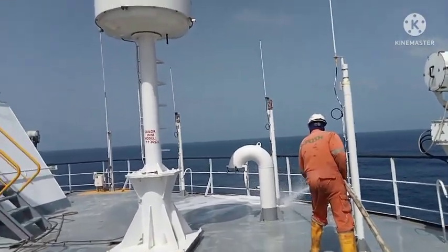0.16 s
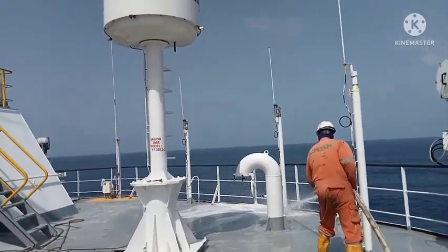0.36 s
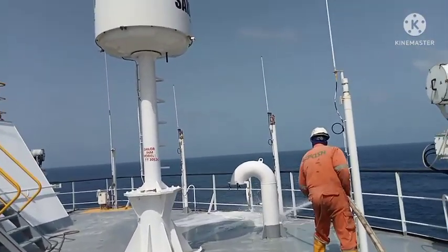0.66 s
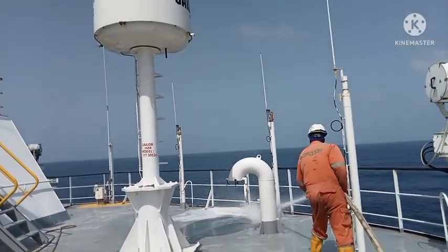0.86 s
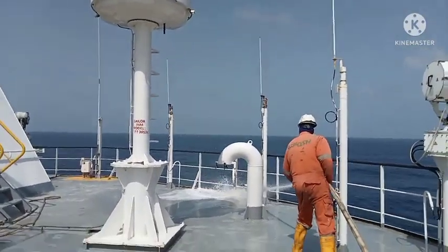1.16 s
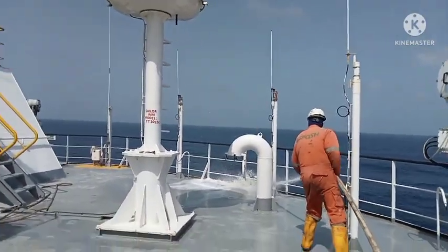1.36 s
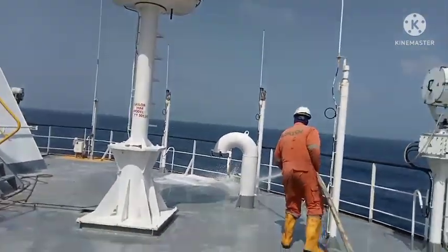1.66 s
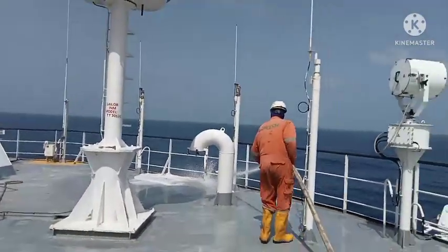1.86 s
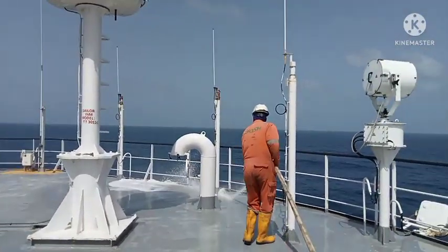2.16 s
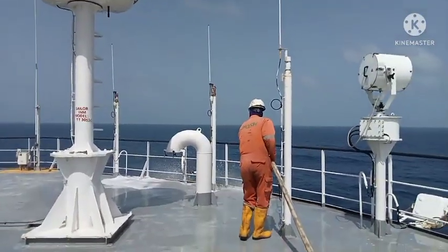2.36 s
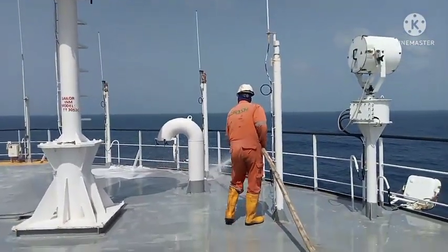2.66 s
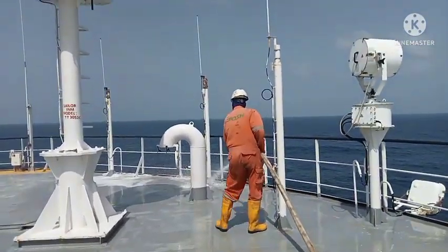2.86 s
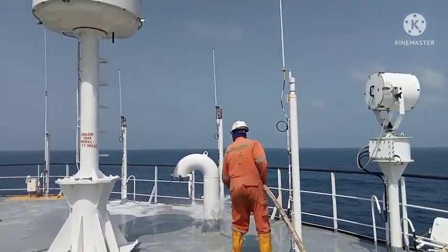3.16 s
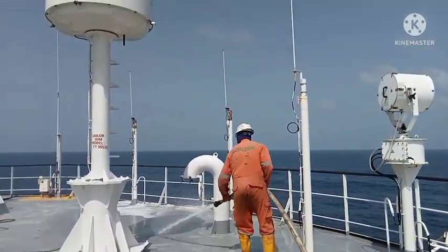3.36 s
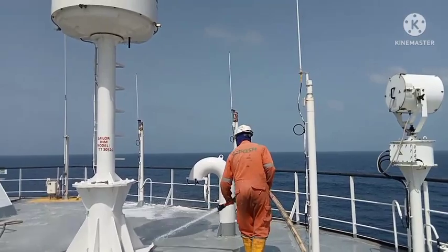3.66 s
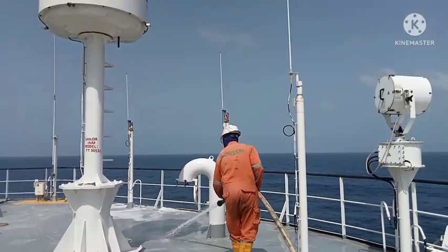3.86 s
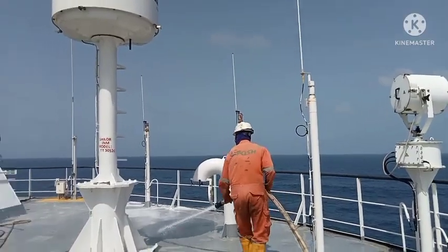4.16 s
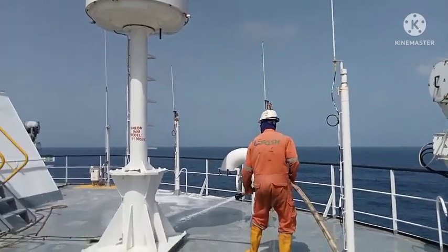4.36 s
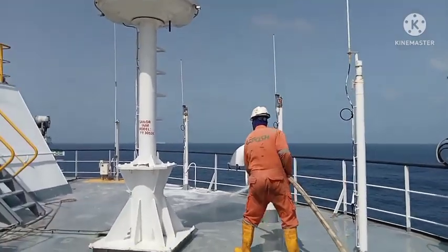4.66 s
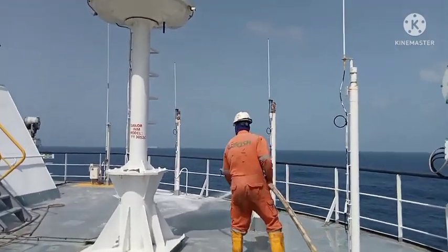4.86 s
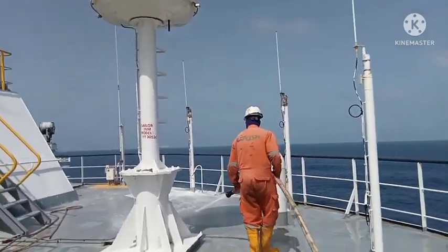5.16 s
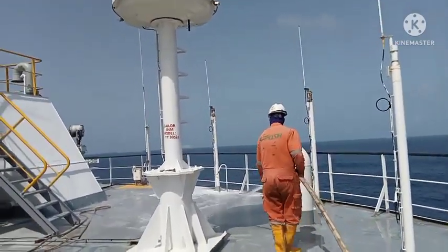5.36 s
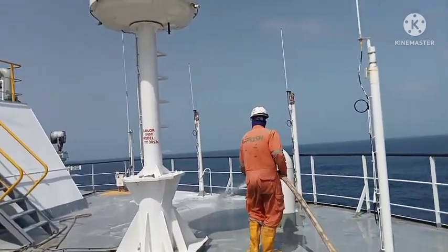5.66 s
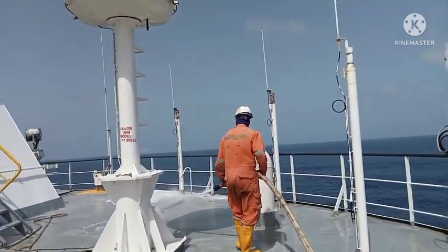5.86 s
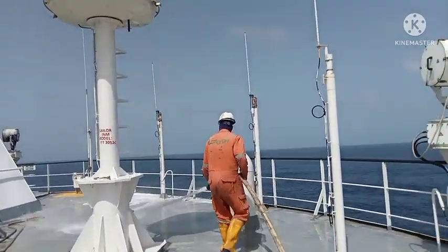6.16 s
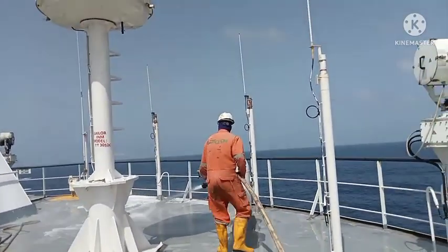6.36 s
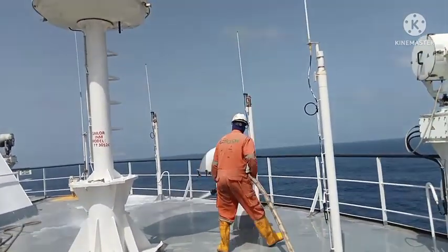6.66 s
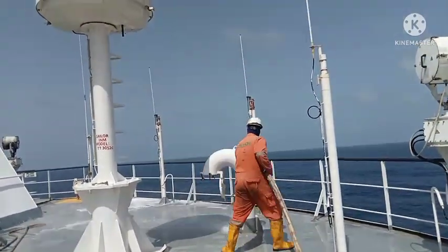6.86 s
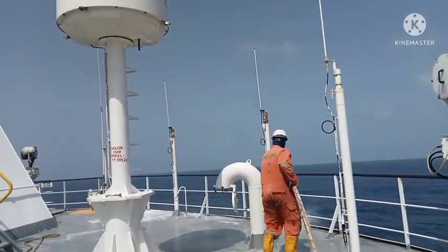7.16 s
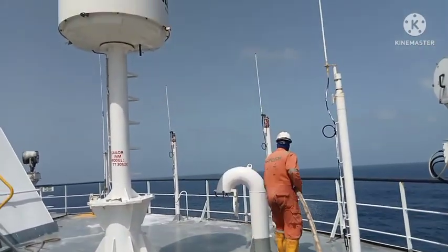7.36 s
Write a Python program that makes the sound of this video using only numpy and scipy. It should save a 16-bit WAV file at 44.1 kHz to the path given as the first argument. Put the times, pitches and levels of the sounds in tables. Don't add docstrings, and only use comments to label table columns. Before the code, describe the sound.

Wind first rumbles and pops hard against an unprotected handheld microphone outdoors, then dies down, leaving hissing hose water on a steel deck. The spray surges and splats irregularly as it crosses rails and posts, strongest around three seconds. Hose fittings click sharply near four. The ship's deep engine drone and soft wash continue throughout, and blustery wind with a loud splash closes the scene.

```python
import sys
import numpy as np
from scipy import signal
from scipy.io import wavfile
from scipy.ndimage import uniform_filter1d

SR = 44100
rng = np.random.default_rng(int(sys.argv[2]) if len(sys.argv) > 2 else 0)


def digitize_waveform(pressure):
    field = np.atleast_2d(pressure).T
    bounded = np.clip(field, -1, 1)
    quanta = np.round(bounded * 32767).astype(np.int16)
    wavfile.write(sys.argv[1], SR, quanta)


def convert_level_to_amplitude(level_db):
    exponent = np.asarray(level_db, float) / 20
    return 10 ** exponent


N = 331279


def jet():
    spray = ringing_steel(droplets())
    return deck_echo(near_fittings(spray))


def droplets():
    # (time [s], level [dB])
    open_deck = [(0, -45), (1, -45.5), (2, -43.5), (3, -47.5), (4, -45), (5, -45), (5.6, -46.5), (6.4, -46),
                 (7.51, -45)]
    # (frequency [Hz], density [dB per Hz])
    spray_colour = [(700, -13), (1090, -4), (1720, -9.5), (2100, -7), (2700, -7.5), (3110, -8.5),
                    (3620, -7.5), (4000, -3), (4900, -0.5), (7500, 0), (10700, -0.5), (12100, -3),
                    (12800, -7.5), (15500, -9.5)]
    # (start [s], length [s], level [dB], loudest region [octaves above 1 kHz])
    rushes = [(-0.011, 0.4, -38, 2.56), (0.22, 0.83, -35, 1.82), (0.274, 0.51, -38.5, 3.4),
              (0.607, 0.21, -28.5, 0.92), (1.031, 0.99, -41.5, 0.73), (1.269, 0.31, -41.5, 3.7),
              (1.466, 0.54, -48, 2.1), (1.737, 0.99, -38, 0.69), (2.119, 0.3, -35.5, 2.87),
              (2.204, 0.86, -34, 0.64), (2.43, 0.72, -41, 3.26), (2.639, 0.74, -47, 0.54),
              (2.77, 0.89, -35, 1.1), (2.88, 0.95, -28, 3.38), (3.109, 0.84, -37.5, 0.97),
              (3.725, 0.37, -36.5, 1.05), (3.728, 0.64, -35, 3.65), (3.876, 0.91, -43, 1.4),
              (3.9, 0.12, -32, 0.79), (4.024, 0.93, -41.5, 3.5), (4.17, 1, -47, 0.96),
              (4.609, 0.98, -43, 1.2), (5.135, 0.93, -41.5, 3.45), (5.662, 0.95, -49, 1.2),
              (6.324, 0.25, -39, 3.4), (6.554, 0.36, -41.5, 3.3), (6.779, 0.46, -31, 3.12),
              (6.84, 0.53, -30, 2.27), (6.941, 0.27, -30.5, 0.17), (7.173, 0.41, -36.5, 1.93)]
    # (start [s], length [s], level [dB], loudest region [octaves above 1 kHz])
    splats = [(0.37, .09, -40, 2.5), (3.09, .14, -38, 3.2), (3.262, 0.099, -29.5, 1.5),
              (0.215, 0.045, -36, 2.6), (0.445, .06, -35, 2), (5.55, .1, -48, 3.8), (5.77, 0.033, -36, 3.8),
              (5.909, .03, -42, 3.7), (5.96, .04, -38.5, 2.4), (6.314, .02, -37, 3.5),
              (6.42, .04, -38.5, 2.3), (2.355, 0.033, -50, 1.2), (3.4, .05, -35, 3),
              (3.445, 0.043, -29.5, 3.2), (4.05, 0.076, -31, 3.8), (6.382, 0.1, -34, 3.5),
              (6.63, 0.029, -41, 3.7), (7.043, 0.017, -16.5, 2.2), (7.095, 0.055, -30, 3.5),
              (7.353, 0.023, -28, 1.5), (7.415, 0.024, -29.5, 1.9)]
    # (start [s], length [s], level [dB], loudest region [octaves above 1 kHz])
    surges = [(0.205, 0.098, -32.5, 3.8), (0.214, 0.06, -33, 0.7), (0.353, 0.17, -34, 1.3),
              (0.531, 0.19, -31, 1.3), (1.984, 0.1, -35, 3.7), (2.556, 0.13, -29, 3.26),
              (2.608, 0.21, -28.5, 0.12), (2.79, 0.36, -30, 0.6), (2.791, 0.38, -33, 3.2),
              (3.076, 0.22, -26.5, 3.8), (3.089, 0.11, -30.5, 0.9), (3.254, 0.13, -28, 1.5),
              (3.893, 0.23, -38, 3), (4.439, 0.05, -38, 1.34), (4.732, 0.37, -40, 3.75),
              (5.015, 0.14, -46, 3.6), (5.075, 0.11, -37, 3.9), (5.136, 0.21, -38.5, 3.35),
              (5.544, 0.24, -36, 4.7), (5.761, 0.14, -37, 1.7), (5.807, 0.054, -36, 0.84),
              (5.896, 0.16, -35, 3.3), (6.309, 0.026, -39, 3.8), (6.973, 0.091, -23.5, 2.43),
              (7.347, 0.035, -26, 0.51), (7.405, 0.23, -41, 2.2), (7.483, 0.201, -36, 3),
              (7.495, 0.059, -34, 0.31)]
    # (start [s], length [s], level [dB], loudest region [octaves
    # above 1 kHz])
    narrow_hisses = [(.4, 0.34, -41, 5), (.55, .25, -37, 1.5), (.92, .3, -45, -3), (1, 0.28, -44, 0.5),
                     (1.2, .3, -44, 2), (1.95, 0.23, -47, 4.5), (1.98, .25, -44, 5), (2.05, 0.22, -43, -1),
                     (2.1, 0.24, -41, 3.5), (2.85, .15, -42, -5), (3, .15, -28, 1.2), (3.07, 0.19, -32, 2.45),
                     (3.2, 0.26, -42, -2), (3, 0.27, -39, 0), (4.15, 0.25, -35.5, 3), (4.1, .5, -51, 7.5),
                     (4.48, 0.091, -41, -0.5), (4.85, 0.23, -45, 2.6), (5.2, .45, -42, -0.5),
                     (5.5, 0.27, -37, 2.5), (5.55, .15, -44, 6), (6.3, 0.22, -42, 0.3), (7.2, 0.18, -45, 4),
                     (.05, 0.25, -37, 2.5), (4.3, 1, -42, 2), (2.24, 0.1, -34, 0.5), (3.1, .15, -31, 3.2),
                     (3.2, .2, -35, 6.5)]
    tilt_db = -0.04
    patchy_db, flutter_db, grain_db = 1.07, 1.05, 1.0
    surge_late_s = 0.0037

    hz, noise = zip(*bands(676, 15720, count=30))
    hz = np.array(hz)
    steady = convert_level_to_amplitude(in_time(open_deck)[0]) ** 2
    sweep = heard(rushes, hz, narrow_db=6.5)
    sweep = sweep + heard(splats, hz, narrow_db=7.4, rise_s=0.0056)
    late_surges = np.add(surges, [surge_late_s, 0, 0, 0])
    sweep = sweep + heard(late_surges, hz, narrow_db=3.5, rise_s=0.013)
    sweep = sweep + heard(narrow_hisses, hz, narrow_db=50)

    together = flutter_db * drift(13.3) + grain_db * drift(270)
    spray = 0
    for f, band, power in zip(hz, noise, sweep):
        colour_db = at_hz(spray_colour, f) + 7.26 + tilt_db * np.log2(f / 4000)
        band_db = colour_db + together + patchy_db * drift(3.4)
        spray = spray + convert_level_to_amplitude(band_db) * np.sqrt(steady + fill(power)) * band
    return spray


def ringing_steel(spray):
    # (frequency [Hz], width [Hz], level [dB])
    steelwork = [(1020, 650, -5.5), (2020, 1800, -11.5), (3104, 450, 2.5), (3910, 180, -9.5),
                 (11750, 260, -3.5)]
    # (time [s], level [dB])
    vent = [(0, -22), (.5, -4), (1.6, -8), (2.1, -6), (2.9, -1), (3.15, -10), (3.35, -6), (3.9, 5),
            (4.4, -15), (4.9, -7), (5.4, -11), (6.5, -20), (6.9, -11), (7.51, -14)]
    plates = sum(convert_level_to_amplitude(db + 0.8 * drift(6.5)) * resonance(spray, hz, w) for hz, w, db in steelwork)
    spray = spray + plates
    return spray + convert_level_to_amplitude(in_time(vent)[0]) * resonance(spray, hz=4970, width_hz=430)


def near_fittings(spray):
    fitting_lags = [.7, .9, 1.05, 1.3, 1.5, 1.7]
    usual_share = .05
    return spray + sum(usual_share * drift(5.8) * np.roll(spray, round(ms * SR / 1000)) for ms in fitting_lags)


def deck_echo(spray):
    # (start [s], length [s], lag [ms], share [ratio])
    echoes = [(-0.08, 0.34, 1.24, 0.52), (0.19, 0.67, 1.28, 0.39), (0.23, 0.25, 1.08, 0.27),
              (0.95, 0.34, 1.07, 0.28), (0.97, 0.25, 1.63, 0.27), (1.69, 0.34, 1.21, 0.36),
              (1.76, 0.76, 0.84, 0.27), (2.07, 0.42, 1.24, 0.36), (2.58, 0.34, 1.2, 0.29),
              (2.94, 0.25, 1.4, 0.33), (3.32, 0.34, 1.03, 0.31), (3.37, 0.34, 1.23, 0.27),
              (3.71, 0.59, 1.0, 0.41), (4.65, 0.34, 0.8, 0.28), (4.65, 0.34, 1.13, 0.38),
              (4.97, 0.25, 1.12, 0.28), (5.41, 0.5, 1.23, 0.47), (5.48, 0.17, 1.74, 0.28),
              (5.51, 0.25, 0.81, 0.4), (5.61, 0.25, 1.6, 0.33), (6.28, 0.34, 0.74, 0.27),
              (6.53, 0.34, 1.29, 0.3), (6.81, 0.67, 1.28, 0.44), (6.83, 0.09, 1.22, 0.27),
              (7.11, 0.17, 1.01, 0.31), (7.29, 0.25, 1.74, 0.29)]
    start_s, length_s, lag_ms, share = np.transpose(echoes)
    shares = share[:, None] * swell(start_s, length_s, 0.45)
    dull = signal.lfilter(*signal.butter(1, 13000, fs=SR), spray)
    late = sum(fill(part) * np.roll(dull, round(ms * SR / 1000)) for ms, part in zip(lag_ms, shares))
    return (spray + late) / fill(np.sqrt(1 + (shares ** 2).sum(axis=0)))


def whistles(spray):
    usual_db, width_share = -8.0, .03
    pitches = np.geomspace(900, 12000, num=34) * rng.uniform(.97, 1.03, 34)
    return sum(convert_level_to_amplitude(usual_db) * drift(5.0) * resonance(spray, hz, width_share * hz) for hz in pitches)


def wind():
    # (frequency [Hz], density [dB per Hz])
    buffet = [(50, -48), (90, 1), (150, 5.5), (240, 1), (480, -8), (900, -24), (1400, -39.5), (2400, -81)]
    lumpy_db, own_db = 1.5, 1.2
    thud_even, rasp_even = 0.36, 0.27

    gust, gust_bright = gusts()
    puff, puff_bright = puffs()
    gust = gust * convert_level_to_amplitude(lumpy_db * drift(22))
    level = np.hypot(gust, puff)
    bright = (gust_bright * gust + puff_bright) / (gust + puff)
    parts = []
    for hz, band in bands(47.2, 2676, count=14):
        band_db = at_hz(buffet, hz) + bright * np.log2(hz / 350) + own_db * drift(34)
        parts.append(convert_level_to_amplitude(band_db) * steadied(band, hz))
    thud, rasp = sum(parts[:6]), sum(parts[6:])

    thud_swing = uniform_filter1d(unit(thud) ** 2, size=700) + 0.14
    rasp_swing = uniform_filter1d(unit(rasp) ** 2, size=250) + 0.015
    crackle = convert_level_to_amplitude(1.1 * drift(90))
    flow = thud / thud_swing ** (thud_even / 2) + rasp / rasp_swing ** (rasp_even / 2)
    return level * crackle * convert_level_to_amplitude(1.1) * unit(flow)


def gusts():
    # (start [s], length [s], level at 200-600 Hz [dB], brightness [dB per octave])
    gust_rows = [(-0.145, 0.21, -2, 2), (0.113, 0.19, -21, 4), (0.264, 0.095, -17.5, -2.5),
                 (0.374, 0.072, -28, -4.5), (0.38, 0.24, -27.5, 4), (0.5, 0.083, -18.5, -3),
                 (0.622, 0.3, -35.5, -1.5), (0.623, 0.061, -20, 3), (0.887, 0.2, -34.5, -10.5),
                 (2.44, 0.25, -26, 6), (2.475, .09, -28, -2), (2.658, 0.13, -29.5, -2),
                 (3.78, 0.1, -34.5, 6), (4.425, 0.13, -35, 1), (3.666, 0.078, -31.5, 1),
                 (5.085, 0.048, -29, -3), (5.273, 0.14, -17.5, 2.5), (5.35, 0.19, -31.5, -4),
                 (5.421, 0.2, -22, 0), (5.616, 0.1, -26, 0), (5.747, 0.17, -29, 6), (5.929, 0.077, -36, 7),
                 (6.509, 0.097, -28.5, -11), (6.53, 0.29, -32.5, -1), (6.605, 0.074, -17, 4.5),
                 (6.761, 0.049, -15.5, 2.5), (6.864, 0.069, -19, -6.5), (6.939, 0.074, -24.5, -4),
                 (7.049, 0.33, -18, -3), (7.271, 0.23, -17.5, 7.5), (7.35, 0.096, -15, -8)]
    lull_db = -81
    start_s, length_s, gust_db, tilt_db = np.transpose(gust_rows)
    power = (convert_level_to_amplitude(gust_db + 0.5)[:, None] * swell(start_s, length_s, rise=0.43)) ** 2
    total = power.sum(axis=0) + convert_level_to_amplitude(lull_db) ** 2
    return fill(np.sqrt(total)), fill(tilt_db @ power / total)


def puffs():
    # (time [s], peak level [dB], length [s], brightness [dB per octave])
    eddies = [(0.007, -2, 0.017, 0), (0.03, -23, 0.024, -8), (0.048, -13.5, 0.028, -3),
              (0.079, -16, 0.017, 1), (0.118, -13, 0.031, 1), (0.141, -15, 0.015, -7),
              (0.18, -17.5, 0.023, 2), (0.198, -8, 0.029, 5.5), (0.218, -16, 0.034, -1),
              (0.249, -19, 0.036, -3), (0.296, -22, 0.023, 0.5), (0.31, -13.5, 0.034, 0),
              (0.35, -20, 0.028, -9), (0.395, -18.5, 0.027, -6), (0.416, -14, 0.031, -2.5),
              (0.454, -21, 0.021, 6), (0.493, -13.5, 0.022, 6.5), (0.515, -23, 0.026, -6),
              (0.553, -16.5, 0.021, 1), (0.649, -21, 0.03, -2), (0.665, -20, 0.031, 0),
              (0.803, -30, 0.025, -8), (0.983, -21.5, 0.017, -13.5), (1.034, -23, 0.02, 6),
              (2.23, -32, 0.025, -1), (2.49, -19.5, 0.028, 4), (2.526, -22, 0.025, -4),
              (2.55, -31, 0.022, -2), (2.616, -22, 0.022, 8), (2.719, -25, 0.029, 0.5),
              (5.287, -34, 0.018, -8), (5.31, -23, 0.03, -12), (5.339, -8, 0.013, -4),
              (5.39, -31, 0.023, 0.5), (5.482, -16, 0.018, -4), (5.514, -14.5, 0.029, 2.5),
              (5.543, -18, 0.031, -3), (5.574, -23, 0.03, 7), (5.646, -29, 0.023, -6),
              (5.673, -24, 0.018, 1), (5.707, -8.5, 0.025, -1.5), (5.727, -19, 0.017, -16),
              (5.768, -27, 0.025, 2), (5.783, -26, 0.028, -3), (5.824, -23, 0.023, -1),
              (5.952, -29, 0.027, -8)]
    # (time [s], peak level [dB], length [s], brightness [dB per octave])
    squall = [(6.521, -22, 0.02, 0.5), (6.542, -12.5, 0.018, 0.5), (6.567, -21, 0.02, 0.5),
              (6.627, -11.5, 0.02, 0.5), (6.643, -16, 0.015, 0.5), (6.671, -14.5, 0.021, 0.5),
              (6.699, -24, 0.029, 0.5), (6.73, -11.5, 0.019, 0.5), (6.771, -17, 0.023, 0.5),
              (6.784, -12, 0.014, 0.5), (6.809, -7.5, 0.022, 0.5), (6.835, -10, 0.024, 0.5),
              (6.869, -20, 0.018, 0.5), (6.91, -14, 0.02, 0.5), (6.949, -17, 0.015, 0.5),
              (6.972, -16, 0.014, 0.5), (7.079, -20, 0.025, 0.5), (7.098, -26, 0.02, 0.5),
              (7.098, -17, 0.043, 0.5), (7.138, -4, 0.013, 0.5), (7.174, -9, 0.018, 0.5),
              (7.187, -15, 0.031, 0.5), (7.227, -1.5, 0.013, 0.5), (7.249, -34, 0.02, 0.5),
              (7.285, -8.5, 0.02, 0.5), (7.321, -24, 0.02, 0.5), (7.334, -12, 0.025, 0.5),
              (7.349, -14, 0.021, 0.5), (7.367, -14, 0.023, 0.5), (7.389, -10, 0.022, 0.5),
              (7.401, -7.5, 0.011, 0.5), (7.438, -9.5, 0.028, 0.5), (7.469, -26, 0.025, 0.5)]
    level, bright = np.zeros(N), np.zeros(N)
    for s, db, length_s, tilt in list(eddies) + list(squall):
        at = round(s * SR)
        t = np.arange(SR // 5)[:N - at] / SR
        shape = convert_level_to_amplitude(db + 5.5 - 18 * t / length_s) * (1 - np.exp(-t / 0.0041))
        level[at:at + len(t)] += shape
        bright[at:at + len(t)] += tilt * shape
    return level, bright


def flicks():
    # (time [s], peak level [dB], frequency [Hz])
    pushes = [(0.012, -13, 253), (0.1185, -13, 520), (0.025, -4, 302), (0.209, -4, 330), (0.318, -13, 380),
              (0.497, -10, 454), (2.496, -14, 160), (2.522, -12, 300), (2.54, -10, 326), (5.342, -19, 478),
              (5.516, -7, 420), (5.58, -10.5, 480), (5.735, -9, 250), (6.647, -12, 317), (6.812, -6, 327),
              (6.841, -7, 513), (6.535, -10.5, 145), (6.814, -9, 646), (7.14, -10, 306), (7.176, -4, 270),
              (7.229, -10, 400), (7.286, -15, 520), (7.232, -3.5, 646), (7.368, -8, 450), (7.401, -10, 279),
              (7.44, -10, 302)]
    swing_cycles, rise_s = 6.5, 0.00042
    out, t = np.zeros(N + SR), np.arange(SR // 10) / SR
    for s, db, hz in pushes:
        envelope = convert_level_to_amplitude(db - 60 * t * hz / swing_cycles) * (1 - np.exp(-t / rise_s))
        out[round(s * SR):][:len(t)] -= envelope * np.cos(2 * np.pi * hz * t)
    return out[:N]


def ticks():
    # (time [s], peak level [dB], frequency [Hz], t60 [s])
    knocks = [
        (2.36, -25, 2230, .017),
        (3.931, -16, 2300, .013),
        (3.9305, -19, 2900, .014),
        (3.9445, -15, 2150, .017),
        (3.945, -21, 1500, .011),
        (3.945, -27, 900, .015),
        (3.965, -28, 2100, .02),
        (4.448, -38, 2400, .02),
        (6.5, -37, 1900, .02),
        (6.597, -37, 1880, .02),
    ]
    t = np.arange(N) / SR
    return sum(struck([(s, db, .0004, t60)]) * np.sin(2 * np.pi * hz * (t - s)) for s, db, hz, t60 in knocks)


def engine():
    # (time within the cycle [s], level [dB])
    firings = [(0.0088, 5.3), (0.0251, 1.1), (0.042, 3.7), (0.0566, -0.0), (0.0719, 4.3), (0.1049, 2.3),
               (0.1087, 9.8), (0.1238, 0.2), (0.1438, -5.0), (0.1634, 5.9), (0.1728, 10.1), (0.1901, 1.6)]
    # (frequency [Hz], width [Hz], level [dB])
    funnel = [(62.2, 66.1, -57.6), (93.7, 4.0, -37.7), (118.7, 4.0, -35.4), (137.0, 4.0, -36.0)]
    # (multiple of the cycle [ratio], peak level [dB])
    orders = [(6, -54.4), (7, -45.8), (8, -43.9), (9, -37.3), (10, -46.5), (11, -43.7), (12, -44.6),
              (13, -40.0), (14, -33.6), (15, -30.4), (16, -35.1), (17, -29.9), (18, -25.3), (19, -47.7),
              (20, -36.6), (21, -40.6), (22, -32.2), (23, -21.6), (24, -40.5), (25, -38.4), (26, -23.9),
              (27, -42.6), (28, -34.6), (29, -35.6), (30, -31.9), (31, -32.5), (32, -37.7), (33, -45.1),
              (34, -36.4), (35, -34.6)]
    # (time [s], level [dB])
    heading = [(0, -1.5), (1, -0.5), (2, 1), (3, 1.5), (4, 2), (5, 0.5), (6, -0.5), (7, -1.5), (7.51, -0.5)]
    cycle_hz, silencer_hz = 5.0, 185
    wander_db, wander_rad = 1.3, .13

    order, level_db = np.transpose(orders)
    fire_s, fire_db = np.transpose(firings)
    hz = order * cycle_hz
    train = np.exp(-2j * np.pi * np.outer(hz, fire_s)) @ convert_level_to_amplitude(fire_db)
    pipe = 0
    for k, (f, w, db) in enumerate(funnel):
        pipe = pipe + (-1) ** k * convert_level_to_amplitude(db) * 1j * hz * w / (f ** 2 - hz ** 2 + 1j * hz * w)
    silencer = signal.freqz(*signal.butter(4, silencer_hz, fs=SR), hz, fs=SR)[1]
    start = np.angle(train * pipe * silencer)
    start = start + 2.3 * (order == 31)

    t, throb = np.arange(N) / SR, 0
    for f, db, phase in zip(hz, level_db, start):
        breath = convert_level_to_amplitude(db + wander_db * drift(0.14))
        throb = throb + breath * np.cos(2 * np.pi * f * t + phase + wander_rad * drift(0.32))
    return throb * convert_level_to_amplitude(in_time(heading)[0])


def airflow():
    # (frequency [Hz], density [dB per Hz])
    wash_colour = [(30, -38), (60, -19.5), (115, 2), (135, -0.5), (170, -1.5), (200, -38), (300, -25.5),
                   (520, -23.5), (800, -36.5), (1300, -38)]
    level_db, patchy_db = -30, 1.5
    wash = sum(convert_level_to_amplitude(at_hz(wash_colour, hz) + patchy_db * drift(5.4)) * band
               for hz, band in bands(25.25, 1555, count=16))
    return convert_level_to_amplitude(level_db) * unit(wash)


def hums():
    # (frequency [Hz], rms level [dB])
    upper_orders = [(205, -58.5), (238, -62), (269, -47.5), (307, -49.5), (480, -90), (535, -57.5)]
    width_hz, wander_db = 8.1, 0.0
    out = 0
    for hz, db in upper_orders:
        tone = unit(resonance(rng.standard_normal(N), hz, width_hz))
        out = out + convert_level_to_amplitude(db + wander_db * drift(0.57)) * tone
    return out


def unit(x):
    return x / np.sqrt(np.mean(x ** 2) + 1e-20)


def in_time(rows, outside=None):
    s, *columns = np.transpose(rows)
    return [np.interp(np.arange(N) / SR, s, c, outside, outside) for c in columns]


def at_hz(points, hz):
    point_hz, db = np.transpose(points)
    return np.interp(np.log(hz), np.log(point_hz), db)


def drift(rate):
    r = np.exp(-64 * np.pi * rate / SR)
    slow = signal.lfilter([1], [1, -2 * r, r * r], rng.standard_normal(N // 32 + 3002))[3000:]
    return fill(unit(slow - slow.mean()))


def bands(low_hz, high_hz, count):
    edges = np.geomspace(low_hz, high_hz, count + 1)
    white = rng.standard_normal((2, N + SR // 4))
    for k in range(count):
        sos = signal.butter(2, edges[k:k + 2], "band", fs=SR, output="sos")
        yield np.sqrt(edges[k] * edges[k + 1]), signal.sosfilt(sos, white[k % 2])[SR // 4:]


def resonance(x, hz, width_hz):
    r = np.exp(-np.pi * width_hz / SR)
    poles = [1, -2 * r * np.cos(2 * np.pi * hz / SR), r * r]
    return signal.lfilter([(1 - r * r) / 2, 0, (r * r - 1) / 2], poles, x)


def struck(rows):
    out, t = np.zeros(N + SR), np.arange(SR // 4) / SR
    for s, db, rise, t60 in rows:
        out[round(s * SR):][:len(t)] += convert_level_to_amplitude(db - 60 * t / t60) * (1 - np.exp(-t / rise))
    return out[:N]


def swell(start_s, length_s, rise):
    u = (np.arange(N // 32 + 2) * 32 / SR - start_s[:, None]) / length_s[:, None]
    ramp = np.minimum(u / rise, (1 - u) / (1 - rise))
    return np.sin(np.pi / 2 * np.clip(ramp, 0, 1)) ** 2


def fill(slow):
    return np.interp(np.arange(N) / 32, np.arange(len(slow)), slow)


def heard(rows, hz, narrow_db, rise_s=None):
    start_s, length_s, db, octave = np.transpose(rows)
    if rise_s is None:
        rise = 0.37 + 0 * db
    else:
        rise = np.clip(rise_s / length_s, .01, .5)
    away = np.log2(hz[:, None] / 1000) - octave
    return convert_level_to_amplitude(db - narrow_db * away ** 2) ** 2 @ swell(start_s, length_s, rise[:, None]) ** 2


def steadied(x, hz):
    swing = uniform_filter1d(unit(x) ** 2, size=round(4 * SR / hz)) + 0.13
    return x / swing ** .35


def scene():
    spray = jet()
    water = spray + whistles(spray) + ticks()
    ship = engine() + airflow() + hums()
    return (water + wind() + flicks() + ship)[None]


def low_pass(x):
    return signal.sosfilt(signal.butter(12, 15490, fs=SR, output="sos"), x)


def record(dry):
    top = signal.ellip(8, .3, 60, 15550, fs=SR, output="sos")
    rounded = 1.1 * np.tanh(dry / 1.1)
    mix = signal.sosfilt(top, rounded)
    return low_pass(mix)


dry = scene()
out = record(dry)
digitize_waveform(out)
```